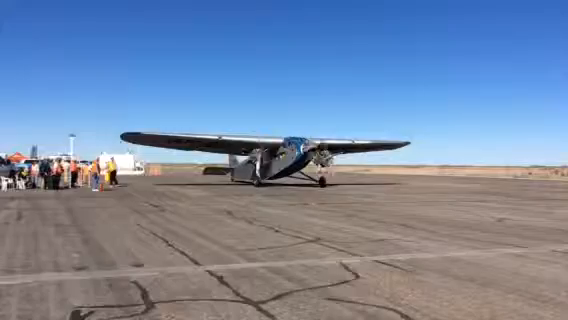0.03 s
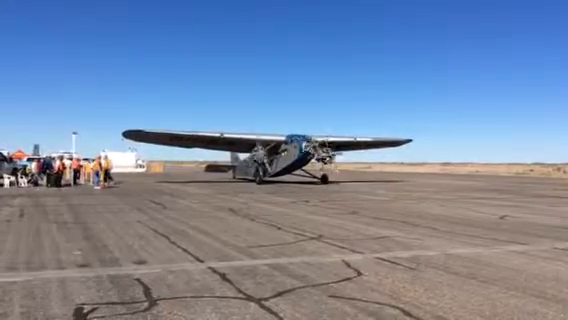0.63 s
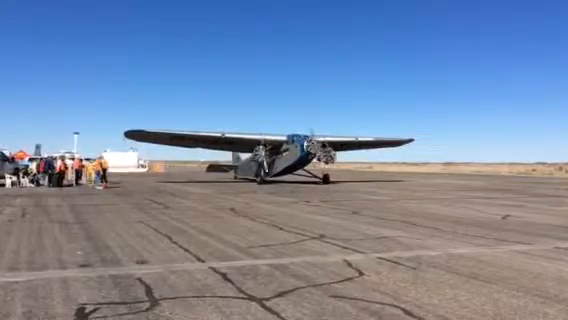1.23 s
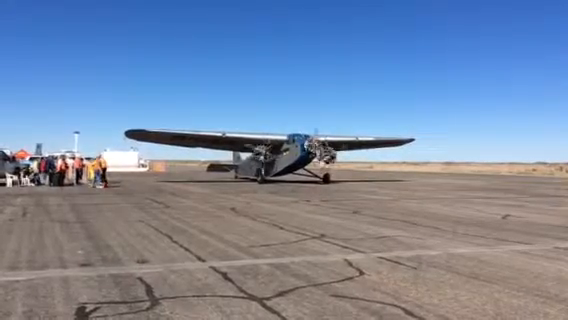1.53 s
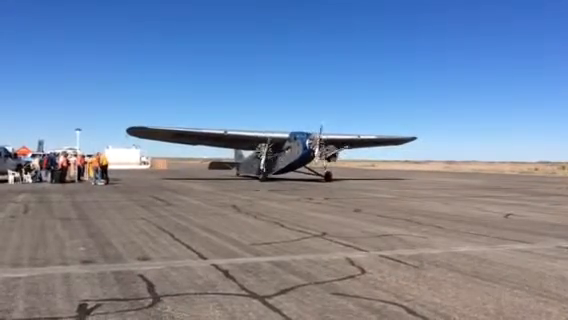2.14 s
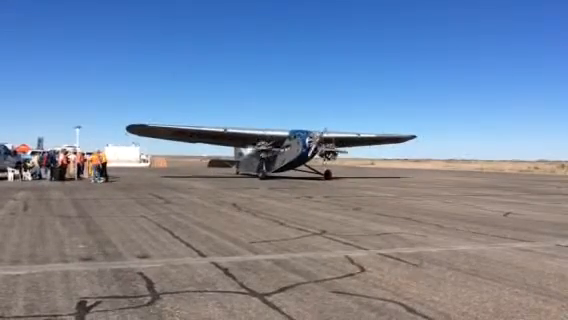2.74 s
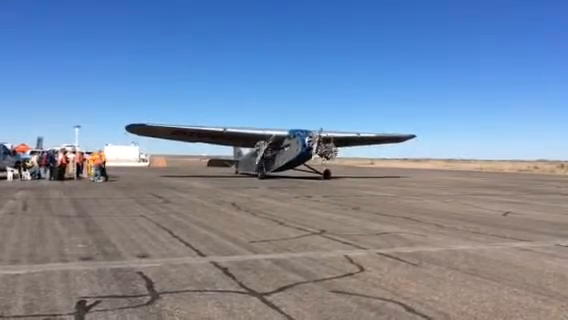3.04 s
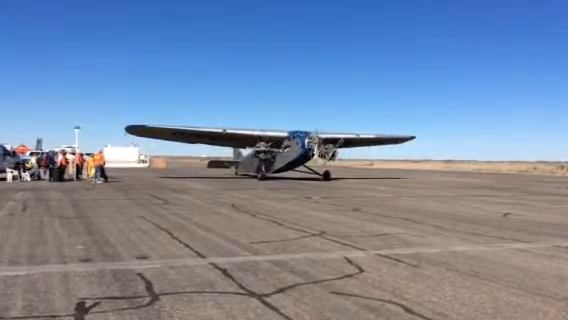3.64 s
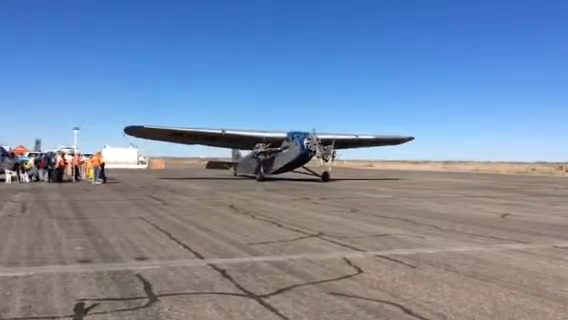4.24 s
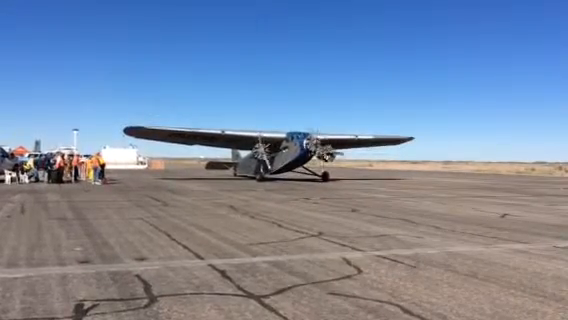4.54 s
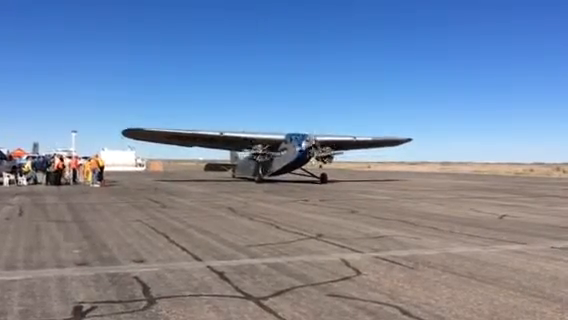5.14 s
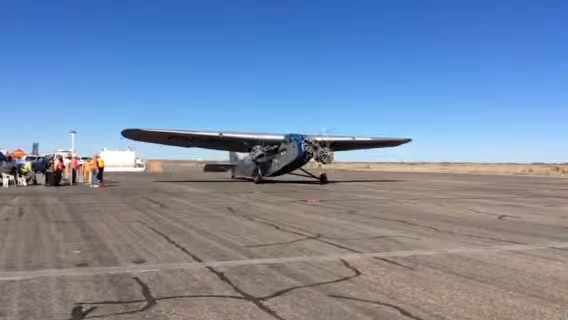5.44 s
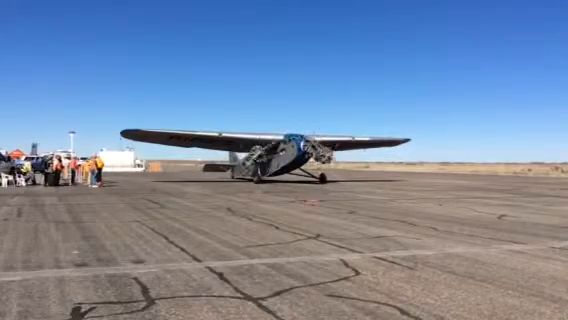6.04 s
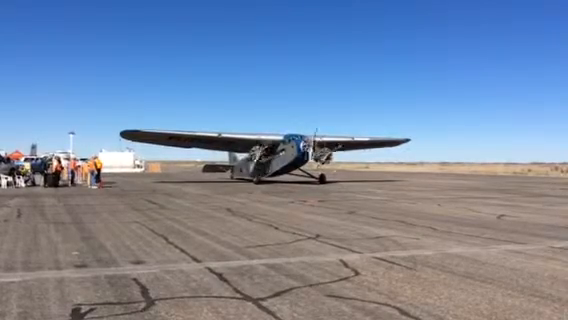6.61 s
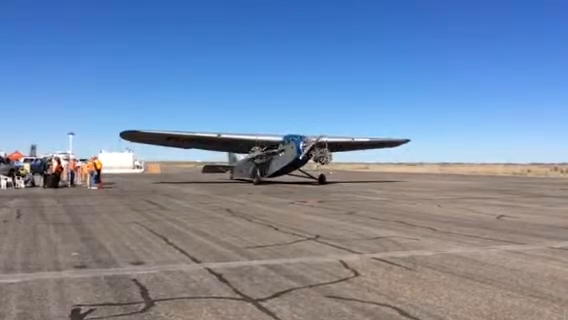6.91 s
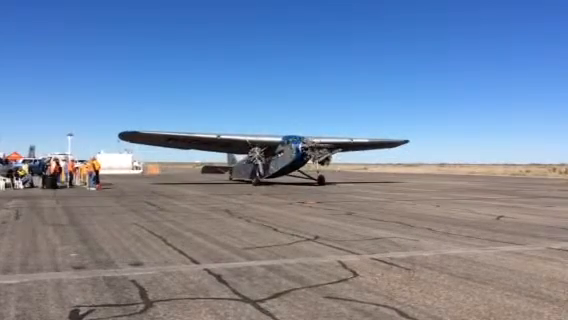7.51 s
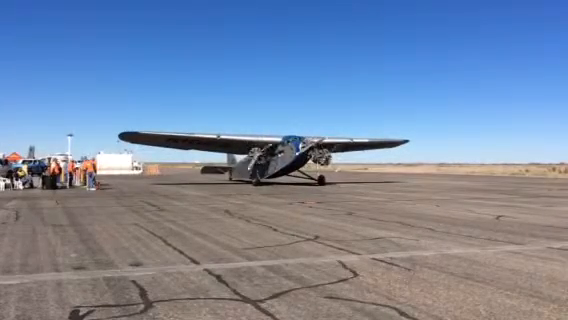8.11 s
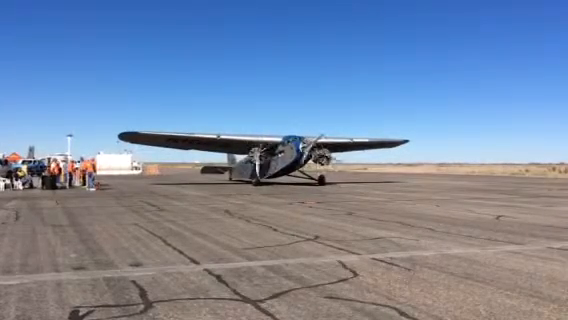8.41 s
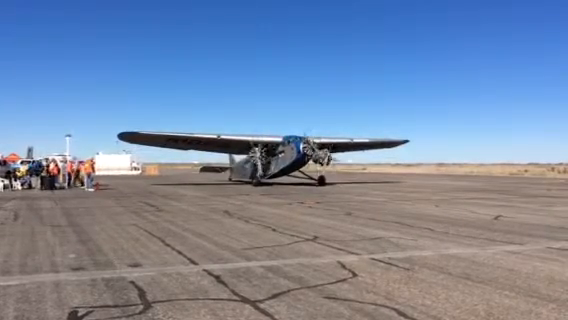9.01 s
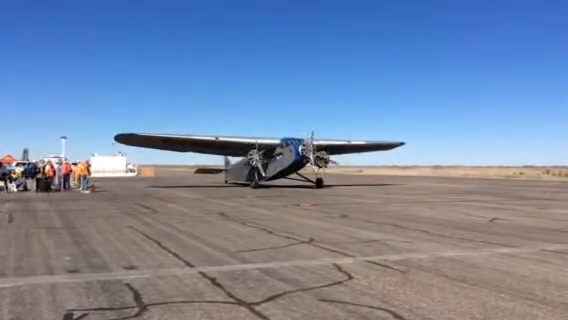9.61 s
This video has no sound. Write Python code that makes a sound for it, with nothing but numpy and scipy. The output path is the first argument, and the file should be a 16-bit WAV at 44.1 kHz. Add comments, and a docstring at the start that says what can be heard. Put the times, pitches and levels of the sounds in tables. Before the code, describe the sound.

Heard at a distance on an open airfield, the three radial engines of a parked plane lope and sputter, with a raspy exhaust, hissing spits and light crackles. The engines then rise in pitch and loudness and run more smoothly, with faint valve ticking and a single muffled backfire. A second push of the throttle brings a deep roar, the exhaust notes pulsing against each other over the propeller hum.

```python
"""An old three-engined airliner on an open apron, some way off, heard through one microphone.
At first its nine-cylinder radials idle unevenly: they lope, spit and misfire, and late-burning fuel
pops in the stacks. From five seconds on the throttles open in two steps and the firings even out,
with one dull backfire just after seven seconds. By the end the three exhaust notes beat against
each other and the propellers swell into a roar."""
import sys
import numpy as np
from scipy import signal
from scipy.fft import rfft, irfft, next_fast_len
from scipy.io import wavfile
from scipy.ndimage import uniform_filter1d, map_coordinates

SR = 44100
rng = np.random.default_rng(int(sys.argv[2]) if len(sys.argv) > 2 else 0)


def generate_wav(sig):
    """Save sig (samples, or channels by samples) to the path in sys.argv[1] as 16-bit PCM at SR."""
    pcm = np.round(np.clip(np.atleast_2d(sig).T, -1, 1) * 32767).astype(np.int16)
    wavfile.write(sys.argv[1], SR, pcm)


N = 430416
TIME = np.arange(N) / SR

# the third engine, slowest at idle, sets the lope: t/s, firing rate/Hz, share of the three/dB
THIRD_ENGINE = [(0, 30.16, 0), (1.1, 26.41, 0), (2.3, 29.18, 0), (3.0, 27.3, 0), (4.3, 28.25, 0),
                (4.8, 27.39, -2), (5.3, 45, -9), (6.1, 69.67, -8), (7.5, 75.1, -11), (8.2, 78.3, -8),
                (9.76, 78.1, -12)]
# the nine cylinders in firing order: strength/dB, lag through the exhaust ring/s
FIRING_ORDER = [(5.5, 0.00026), (3, 0.00213), (7.5, 0.00359), (-1.5, 0.00115), (5, 0.00042), (2, 0.00301),
                (6, 0.002075), (3, 0.00026), (3, 0.00296)]
# colour of spitting gas: f/Hz, level/dB
SPIT_SPECTRUM = [(2350, -20.5), (4000, -2.5), (4300, -9.5), (4620, 3), (4950, 0), (5330, 3), (5770, -6.5),
                 (6460, -2.5), (7200, -18.5), (7410, -13.5), (7940, -10.5), (8400, -7.5), (9210, -9),
                 (10500, -21), (13600, -48), (22000, -120)]
# ringing of the valve gear: f/Hz, level/dB, t60/s
VALVE_GEAR = [(4650, 2.5, 0.043), (5080, 7, 0.031), (5290, 3, 0.032), (5380, -1, 0.044), (8150, -7, 0.033)]


def engine(curve, throttle, overtone_db, scatter_db=7.5, surge_db=1.5, spit_scatter_db=5.0):
    """One radial: its exhaust pulses, its spits, the beat of its two-bladed propeller, its clean note."""
    # clean exhaust note: multiple of the firing rate, level/dB
    harmonics = [(1, -0.5), (2, -7), (3, -15.5), (4, -22.5)]
    rate, share_db = in_time(curve)
    firings = np.cumsum(rate) / SR
    at = np.flatnonzero(np.diff(np.floor(firings)))
    chance = np.clip(rng.standard_normal((1000, 4))[:len(at)], -1.5, 1.5)
    pulse_timing, pulse_strength, spit_strength, spit_timing = chance.T
    cylinder_db, lag_s = np.array(FIRING_ORDER)[np.arange(len(at)) % len(FIRING_ORDER)].T
    idling = 1 - throttle[at]
    # a nearly closed throttle fires less regularly
    jitter_s = np.interp(throttle[at], [0, 1], [0.00159, 0.00021]) * pulse_timing
    # at idle some neighbouring cylinders burn better than the rest, so each cycle surges once
    cycle_db = surge_db * idling * np.cos(2 * np.pi * firings[at] / len(FIRING_ORDER))
    pulse_db = cylinder_db + cycle_db + scatter_db * throttle[at] * pulse_strength + share_db[at]
    pulses = clicks_at(at / SR + jitter_s + lag_s, from_db(pulse_db))
    spit_times = at / SR + jitter_s + 0.00092 * idling * spit_timing
    spits = clicks_at(spit_times, from_db(spit_scatter_db * spit_strength))
    # nine firings take two turns, so four blades pass meanwhile
    blades = from_db(share_db) * rate ** 2 * np.cos(np.pi * firings * 4 / len(FIRING_ORDER)) ** 6
    note = 0
    for k, db in harmonics:
        level_db = db + overtone_db * (k > 1) + 2 * drift(per_s=9.8)
        note += from_db(level_db) * np.cos(2 * np.pi * k * firings)
    return pulses, spits, blades, from_db(share_db) * note


def boom(pulses, notes, throttle, wash_db=-15, rumble_db=-30):
    """Pulses thump in the stacks over a little propeller wash; under power the clean notes stand out."""
    # colour of the boom at idle and under power: f/Hz, level/dB
    idle_spectrum = [(15, -51), (25, -48.5), (46, -2), (65, -4), (80, 0.5), (97, -10.5), (129, -4),
                     (226, -16.5), (274, -14.5), (389, -26.5), (450, -22.5), (580, -39), (990, -120)]
    power_spectrum = [(15, -79), (25, -49), (32, -21), (46, -13), (70, -2.5), (89, 4), (113, -14.5),
                      (157, -11.5), (302, -11), (399, -31), (450, -31), (580, -74), (990, -120)]
    # stack resonances that colour the clean notes: f/Hz, level/dB
    resonances = [(100, -0.5), (152, 4.5), (168, -5), (215, 2)]
    wash = rng.standard_normal(N)
    drive = steady(pulses, size=9000) + from_db(wash_db) * wash
    thumps = steady(band(by_throttle(drive, idle_spectrum, power_spectrum, throttle), 22.4, 536), 9000)
    drone_db = np.interp(throttle, [0, .6], [-6, 2])
    drone = from_db(drone_db) * steady(band(colour(notes, resonances), 56.3, 520), size=9000)
    # levelled quickly at idle, slowly under power so that the beats between the engines come through
    opened = np.clip(2 * throttle, 0, 1)
    exhaust = (1 - opened) * steady(thumps + drone, 2200) + opened * steady(thumps + drone, 9000)
    rumble = from_db(rumble_db) * (1 - throttle / 2) * rms_one(band(wash, 40, 62))
    return exhaust + rumble


def stacks(sound, level_db, surging_db, split_hz=123, growl_lift_db=.5, growl_share=0.37):
    """The deep boom follows every surge of the exhaust, the growl above it only in part."""
    deep = signal.sosfiltfilt(signal.butter(4, split_hz, fs=SR, output="sos"), sound)
    growl_db = level_db + growl_lift_db + growl_share * (surging_db - level_db)
    return from_db(surging_db) * deep + from_db(growl_db) * (sound - deep)


def uneven_running(throttle, boom_db, rasp_db, spit_db, misfire_s=0.04):
    """Levels in dB: closed throttles make the third engine lope; chugs and misfires hit the boom most."""
    # the exhaust chugs louder for a few firings: t/s, rise and fall/s, lift/dB
    chugs = [(.17, .05, 0), (.411, 0.057, 7), (.764, 0.13, 7.5), (1.142, 0.029, 5.5), (1.637, 0.18, 6),
             (1.894, .06, 5), (2.057, 0.087, 5), (2.234, 0.044, 7), (2.602, 0.14, 3), (2.931, 0.032, 3),
             (3.142, .043, 3), (3.704, 0.028, 4), (3.829, 0.039, 2), (4.403, 0.038, 6), (6.379, 0.022, 7),
             (6.73, 0.11, 2), (7.081, 0.035, 5.5), (8.537, .046, 3.5)]
    # the exhaust drops out for a few firings: t/s, dip/dB
    misfires = [(0.599, -4), (0.724, -7.4), (0.97, -6), (1.233, -11), (1.813, -8), (1.948, -2), (2.18, -3),
                (2.373, -5), (2.505, -9), (2.811, -1), (3.323, -7.1), (3.403, -7), (3.651, -2),
                (3.888, -2.1), (4.134, -3), (4.268, -0.8), (5.066, -4), (5.313, -7.5), (6.556, -12),
                (6.943, -10), (7.533, -13)]
    stumble_db = swells(chugs) + swells([(s, misfire_s, db) for s, db in misfires])
    idling = 1 - throttle
    loping = np.clip(1 - throttle / .7, 0, 1)
    # one surge per crankshaft turn; the spit leads and the boom follows
    turns = crank_turns(THIRD_ENGINE)
    lope = loping * np.cos(2 * np.pi * turns)
    late_lope = loping * np.cos(2 * np.pi * (turns - .08))
    return (boom_db + 1.7 * late_lope + stumble_db,
            rasp_db + 1.17 * lope + 0.22 * idling * stumble_db,
            spit_db + 3 * lope + 0.61 * idling * stumble_db)


def rasp(pulses, blades, throttle, edge_db=-9, rush_db=-5):
    """Each pulse has a hard edge and a puff of turbulent gas, and knocks the metal; the blades swish."""
    # colour of the rasp at idle and under power: f/Hz, level/dB
    idle_spectrum = [(210, -33), (350, -3.5), (424, -20), (496, -7.5), (870, -14.5), (1260, -7.5),
                     (1420, -15.5), (1560, -5.5), (1700, -11.5), (1950, -2.5), (2280, -10), (2540, -14.5),
                     (2760, -15.5), (3450, -18), (4400, -24.5), (5720, -24.5), (9680, -120)]
    power_spectrum = [(210, -34.5), (350, -4), (402, -8.5), (540, -3.5), (775, -11), (1090, 0.5),
                      (1390, -6), (1540, -1.5), (1700, -6), (1910, 0.5), (2330, -10.5), (3040, -16),
                      (3270, -20), (3450, -19), (4400, -25), (5720, -57), (9680, -120)]
    # ringing of the exhaust ring and cowling: f/Hz, level/dB, t60/s
    knock_modes = [(1848, 4.5, 0.079), (1938, 2, 0.12), (2553, 4, 0.031), (3046, -4.5, 0.055),
                   (3497, -3, 0.044), (3956, -8.5, 0.058)]
    gas, swish, rush = rng.standard_normal((3, N))
    puffs = steady(gas * flare(pulses, swell_s=0.0067, decay_s=0.053))
    swish_db = np.interp(throttle, [0, 1], [-4, 0])
    propellers = from_db(swish_db) * steady(swish * blades)
    drive = puffs + from_db(edge_db) * steady(pulses) + propellers + from_db(rush_db) * rush
    roar = steady(band(by_throttle(drive, idle_spectrum, power_spectrum, throttle), 320, 4500))
    knocks = steady(struck(rush * whoosh(pulses, width_s=0.0012), knock_modes), size=9000)
    knock_db = np.interp(throttle, [0, 1], [-5, -11])
    return steady(roar + from_db(knock_db) * knocks)


def valve_spit(spits, throttle):
    """Gas spits past each opening valve and the valve gear ticks; under power it merges into hiss."""
    jets, hiss = rng.standard_normal((2, N))
    hiss_db = np.interp(throttle, [0, 1], [-4, 1])
    gas = steady(jets * whoosh(spits, width_s=0.0098), size=5000) + from_db(hiss_db) * hiss
    spitting = steady(band(colour(gas, SPIT_SPECTRUM), 3830, SR / 2))
    taps = jets * flare(spits, swell_s=0.001, decay_s=0.00075)
    ticks = steady(struck(taps, VALVE_GEAR), size=5000)
    tick_gain = 0.064 + 3.3 * throttle * (1 - throttle)  # clearest at half throttle
    return steady(spitting + tick_gain * ticks)


def propeller(curve, full_firing_hz=82.3, db_per_octave=15.5, waver_db=4.5):
    """Two blades pass per turn; their clean overtones grow steeply with speed."""
    # propeller hum: multiple of the blade rate, level at full speed/dB
    harmonics = [(4, -40), (5, -39.5), (6, -39.5), (7, -45), (8, -43), (9, -49)]
    speed_db = db_per_octave * np.log2(in_time(curve)[0] / full_firing_hz)
    passes = 2 * crank_turns(curve)
    return sum(from_db(db + speed_db + waver_db * drift(per_s=12)) * np.cos(2 * np.pi * k * passes)
               for k, db in harmonics)


def blade_chop(curve, throttle, depth_db):
    """A gain: near full power each passing blade chops the sound."""
    return from_db(depth_db * throttle ** 2 * np.cos(4 * np.pi * crank_turns(curve)))


def pops(swell_s=0.000812, decay_s=0.0079, crack_db=2.5, sizzle_db=-14.5, valves_db=6, ring_db=4):
    """Unburnt fuel flares in a stack: a short crack, a sizzling top, and the stack rings. Two clanks of the
    exhaust ring are sounded the same way."""
    # late-burning charges, and two clanks of the exhaust ring at 2.668 s and 3.089 s sounded the same way: t/s,
    # relative sizzle level/dB, relative crack level/dB, ring f/Hz
    charges = [(0.136, -49, -40, 3220), (0.157, -49, -41, 3800), (0.19, -53, -42.5, 3900),
               (0.218, -37.5, -38.5, 3000), (0.3286, -35.5, -44, 2580), (0.353, -44, -41, 2990),
               (0.628, -40, -43.5, 3420), (0.7993, -42, -41.5, 2970), (0.9644, -38, -38, 2500),
               (1.123, -34.5, -40.5, 3470), (1.4012, -41, -45, 2570), (2.567, -40.5, -47, 5270),
               (1.476, -32.5, -41.5, 5470), (1.612, -32, -48, 4900), (1.94, -39, -45, 2470),
               (2.235, -38, -46, 2540), (2.668, -45, -47, 2420), (3.089, -46, -47, 2550),
               (4.005, -41, -46, 5270), (4.188, -45, -46, 2600), (4.812, -38, -44, 2420),
               (4.961, -33, -48, 5400), (5.1787, -33.5, -53, 4725), (5.2684, -32, -41, 5200),
               (5.378, -31.5, -46, 5330), (5.459, -30, -43, 5170), (6.5992, -29.5, -43, 5255),
               (7.7583, -33, -46, 5300), (7.8236, -32, -55, 5440)]
    # colour of the crack: f/Hz, level/dB
    crack_spectrum = [(1200, -63), (2200, 11), (3000, 9), (3900, 4.5), (4600, -24), (8000, -60)]
    times, sizzles_db, cracks_db, pitches = np.transpose(charges)
    gas, flame = rng.standard_normal((2, N))
    crack = rms_one(colour(gas, crack_spectrum))
    sizzle = rms_one(colour(flame, SPIT_SPECTRUM)) + from_db(valves_db) * rms_one(struck(gas, VALVE_GEAR))
    kicks = from_db(np.maximum(cracks_db, sizzles_db - 9) + ring_db)
    sound = sum(ring(clicks_at([s + 2 * swell_s], kick), hz, t60=0.061)
                for s, kick, hz in zip(times, kicks, pitches))
    for noise, levels_db in ((crack, cracks_db + crack_db), (sizzle, sizzles_db + sizzle_db)):
        clicks = clicks_at(times, from_db(levels_db))
        sound += noise * (flare(clicks, swell_s, decay_s) + 0.54 * whoosh(clicks, width_s=0.0094))
    return sound


def backfire():
    """A backfire gives one dull, heavily damped thud."""
    # the thud: t/s, level before filtering/dB
    thuds = [(7.1705, -9)]
    return band(ring(blows(thuds), hz=333, t60=0.0084), 140, 490)


def clanks():
    """The exhaust ring clanks now and then at idle."""
    # knocks on the exhaust ring: t/s, level/dB
    knocks = [(.435, -37), (1.61, -30), (3.05, -31), (4.287, -27.5), (4.473, -24), (4.497, -29)]
    return ring(blows(knocks), hz=2000, t60=0.044)


def airframe(x, scatter_db=-17, decay_s=0.055):
    """The corrugated fuselage and wing scatter a faint, short smear after the direct sound."""
    tail = rng.standard_normal(SR // 10) * np.exp(-TIME[:SR // 10] / decay_s)
    return x + from_db(scatter_db) * signal.fftconvolve(x, tail / np.linalg.norm(tail))[:N]


def crank_turns(curve):
    """Turns made so far; all cylinders fire in two turns."""
    return 2 * np.cumsum(in_time(curve)[0]) / SR / len(FIRING_ORDER)


def by_throttle(x, idle, power, throttle):
    """The colour shifts from idle to power as the throttles open."""
    return (1 - throttle) * rms_one(colour(x, idle)) + throttle * rms_one(colour(x, power))


def struck(drive, modes):
    """A metal part rings in all its modes."""
    return sum(from_db(db) * ring(drive, hz, t60) for hz, db, t60 in modes)


def ring(clicks, hz, t60):
    """Each click sets a damped sine ringing."""
    radius, angle = from_db(-60 / (t60 * SR)), 2 * np.pi * hz / SR
    return signal.lfilter([0, np.sin(angle)], [1, -2 * radius * np.cos(angle), radius ** 2], clicks + 1e-18)


def flare(clicks, swell_s, decay_s):
    """Each click becomes a burst that swells quickly and dies away."""
    for seconds in (decay_s, swell_s):
        clicks = signal.lfilter([1], [1, -np.exp(-1 / (seconds * SR))], clicks + 1e-18)
    return clicks / (swell_s * SR)


def whoosh(clicks, width_s):
    """Each click becomes a rounded burst of its own height."""
    size = max(int(width_s * SR), 2)
    return uniform_filter1d(uniform_filter1d(clicks, size), size) * size


def clicks_at(times, heights):
    """Single-sample kicks."""
    clicks = np.zeros(N)
    clicks[np.clip(np.round(np.asarray(times) * SR).astype(int), 0, N - 1)] = heights
    return clicks


def blows(events):
    """Rows of t/s, level/dB as clicks."""
    times, db = np.transpose(events)
    return clicks_at(times, from_db(db))


def swells(events):
    """Level change in dB: each event moves evenly to its extreme and back."""
    return sum(db * np.maximum(0, 1 - np.abs(TIME - s) / width_s) for s, width_s, db in events)


def drift(per_s):
    """A smooth random wander with a spread of about 1."""
    knots = rng.standard_normal(2000)
    coarse = map_coordinates(knots, [TIME[::100] * per_s], order=3, mode="wrap")
    return np.interp(TIME, TIME[::100], coarse)


def colour(x, spectrum):
    """Causal (minimum-phase) filter with the given spectrum."""
    size = 2 * next_fast_len(N // 2 + 8192)
    hz, db = np.transpose(spectrum)
    grid = np.maximum(np.arange(size // 2 + 1) * SR / size, 1)
    gain = from_db(np.interp(np.log(grid), np.log(hz), db))
    cepstrum = irfft(np.log(gain))
    cepstrum[1:size // 2] *= 2
    cepstrum[size // 2 + 1:] = 0
    return irfft(rfft(x, size) * np.exp(rfft(cepstrum)))[:N]


def band(x, low_hz, high_hz):
    """Steep band-pass."""
    edges = [low_hz, min(high_hz, SR / 2 - 1)]
    return signal.sosfilt(signal.butter(4, edges, "band", fs=SR, output="sos"), x)


def steady(x, size=4000):
    """Even out the level over `size` samples to rms 1, keeping the single beats."""
    power = uniform_filter1d(uniform_filter1d(x ** 2, size), size // 2)
    return x / np.sqrt(np.abs(power) + 1e-4 * np.mean(x ** 2))


def in_time(rows):
    """The columns of a curve at every sample."""
    times, *columns = np.transpose(rows)
    return [np.interp(TIME, times, column) for column in columns]


def rms_one(x):
    """Scale to unit power."""
    return x / np.sqrt(np.mean(x ** 2) + 1e-20)


def from_db(db):
    """Decibels to gain."""
    return 10 ** (np.asarray(db) / 20)


def scene():
    """Three engines at their own speeds, heard together from across the apron."""
    # the leading engine and the steadier second: t/s, firing rate/Hz, share of the three/dB
    first_engine = [(0, 35.34, -2), (2.7, 37, -2), (3.2, 32, -2), (4.3, 32, -2), (4.6, 38.5, -1),
                    (5.0, 40.2, -3), (5.5, 49.5, -1), (5.75, 53.2, 3), (6.2, 57.8, 5), (7.6, 59, 3),
                    (8.05, 62.5, 3), (8.5, 75, 2), (9.0, 83, 3), (9.76, 87, 3)]
    second_engine = [(0, 68, 0), (1.1, 62, -1), (2.5, 71, -2), (3.0, 63.5, -1), (3.6, 69, -1), (4.8, 68, 1),
                     (5.6, 62.62, 0), (6.2, 71.12, -1), (6.7, 70.34, -2), (7.2, 72.25, -3),
                     (7.8, 70.04, -5), (8.25, 69.88, 1), (8.6, 67.78, 1), (9.0, 69.31, 1), (9.76, 65.1, 0)]
    # the run-up: t/s, throttle opening/0-1, boom level/dB, rasp level/dB, spit level/dB
    run_up = [(.1, 0, -36.5, -38.5, -57), (1.1, 0.16, -36, -41.5, -58), (3.9, 0.18, -34.5, -40.5, -57),
              (4.9, 0.16, -33, -39, -54), (5.4, 0.29, -30, -35, -49.5), (5.9, 0.48, -28.5, -33.5, -47.5),
              (7.4, 0.64, -29, -33, -50.5), (7.7, 0.56, -26, -32, -47), (8.3, 0.77, -23, -30.5, -47),
              (9, 0.93, -22.5, -28, -45), (9.76, 0.8, -24.5, -28, -45)]
    throttle, boom_db, rasp_db, spit_db = in_time(run_up)
    surging_db, rasp_db, spit_db = uneven_running(throttle, boom_db, rasp_db, spit_db)
    engines = [engine(first_engine, throttle, overtone_db=-2.5),
               engine(second_engine, throttle, overtone_db=-4.5),
               engine(THIRD_ENGINE, throttle, overtone_db=-4.0)]
    pulses, spits, blades, notes = zip(*engines)
    pulses, blades, notes = sum(pulses), sum(blades), sum(notes)
    # the valves of the first engine lead, the more so as the throttles open
    spits = spits[0] + (1 - throttle) * (from_db(-7) * spits[1] + from_db(-12) * spits[2])
    rasp_gain = from_db(rasp_db) * blade_chop(first_engine, throttle, depth_db=0.3)
    spit_gain = from_db(spit_db) * blade_chop(first_engine, throttle, depth_db=1.3)
    low = stacks(boom(pulses, notes, throttle), boom_db, surging_db) + backfire()
    middle = rasp_gain * rasp(pulses, blades, throttle) + clanks()
    top = spit_gain * valve_spit(spits, throttle) + pops()
    return (low + propeller(first_engine) + airframe(middle + top))[None]


def record(dry, start_s=.12, cutoff_hz=12800):
    """The microphone opens after a moment; the top is cut."""
    return signal.sosfilt(signal.ellip(8, .2, 60, cutoff_hz, fs=SR, output="sos"), dry * (TIME >= start_s))


dry = scene()
out = record(dry)
generate_wav(out)
```